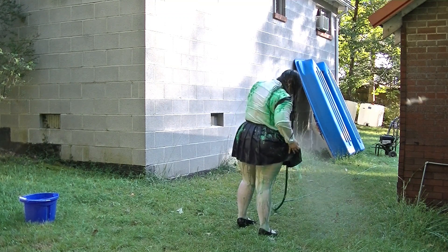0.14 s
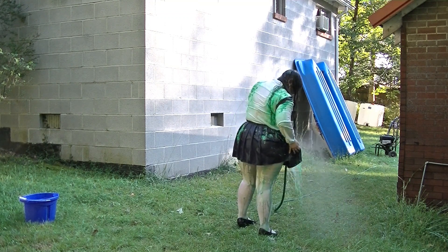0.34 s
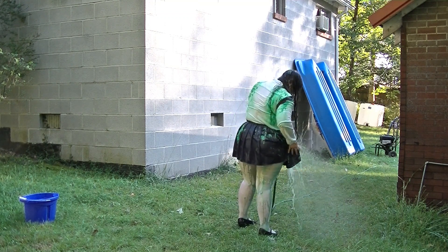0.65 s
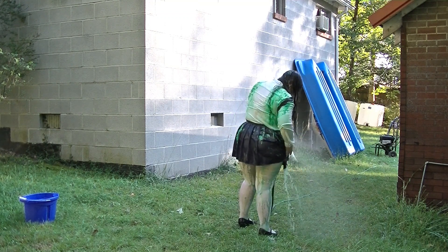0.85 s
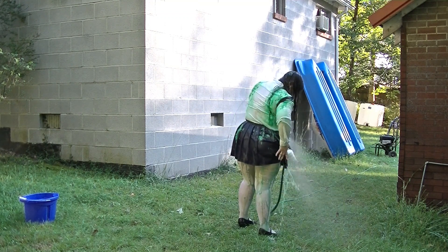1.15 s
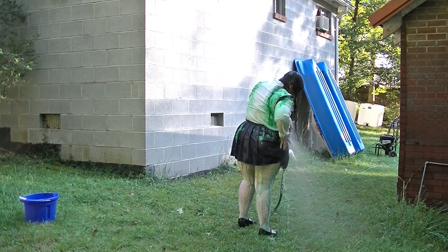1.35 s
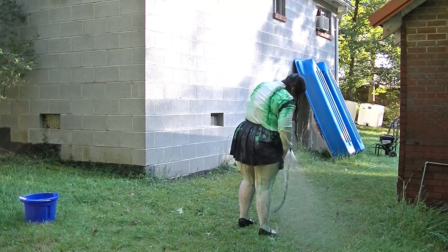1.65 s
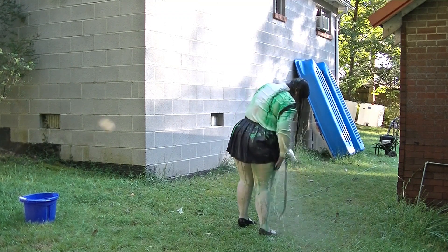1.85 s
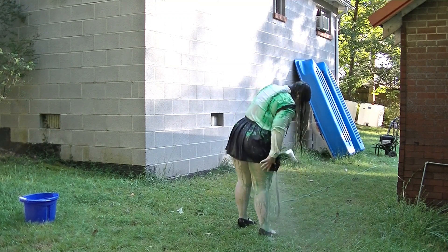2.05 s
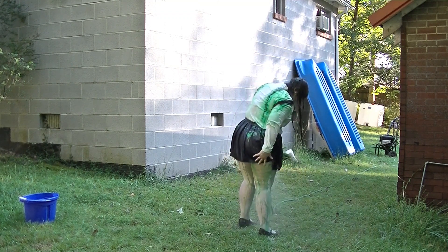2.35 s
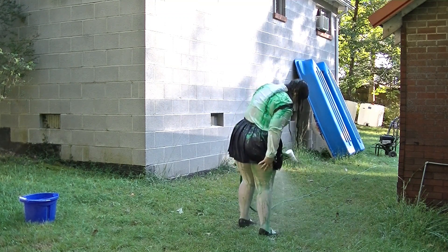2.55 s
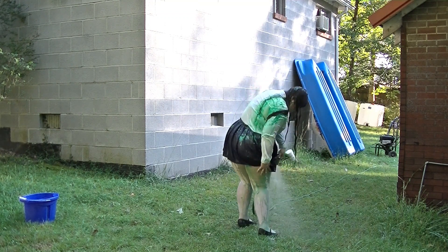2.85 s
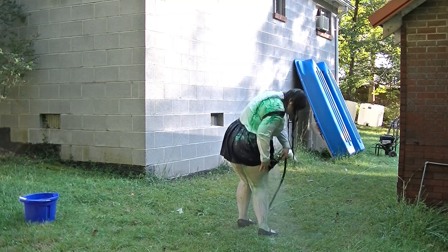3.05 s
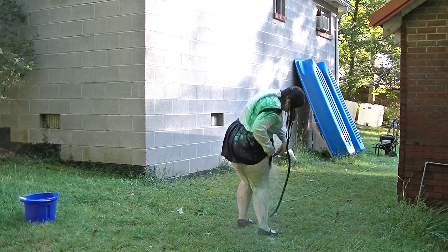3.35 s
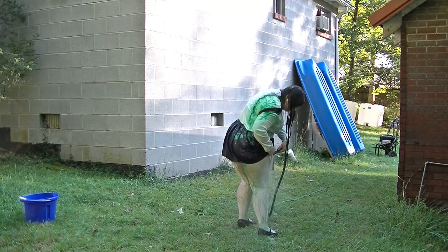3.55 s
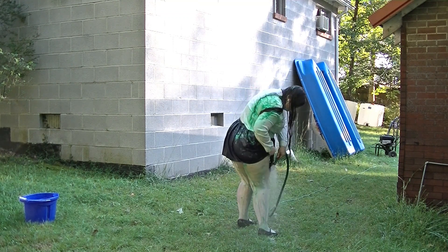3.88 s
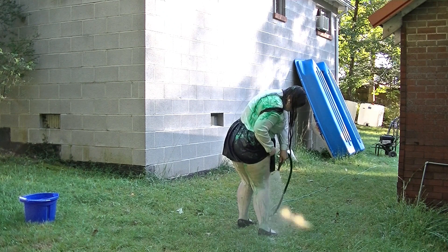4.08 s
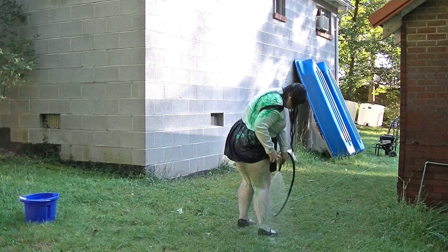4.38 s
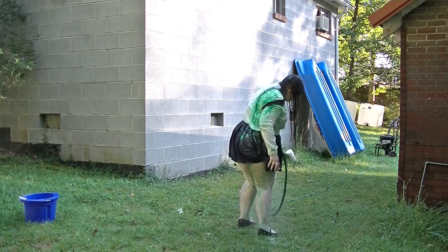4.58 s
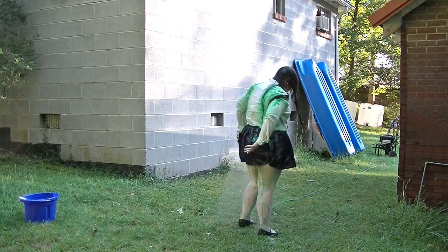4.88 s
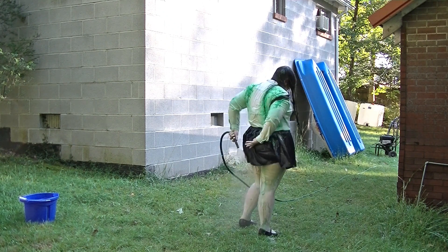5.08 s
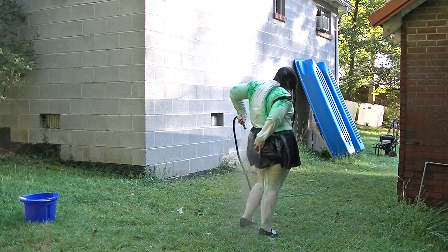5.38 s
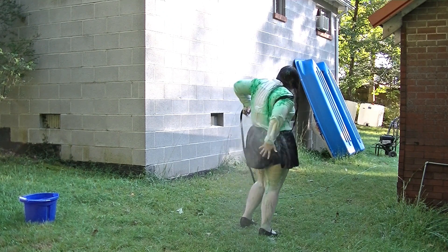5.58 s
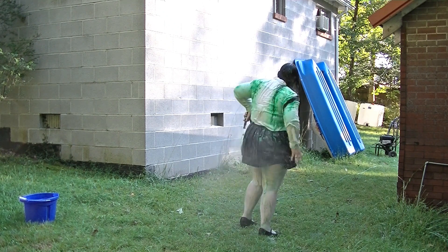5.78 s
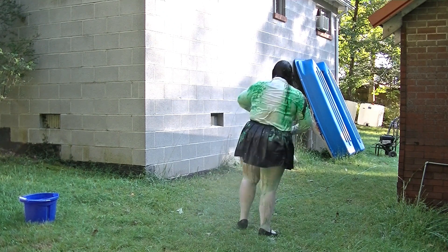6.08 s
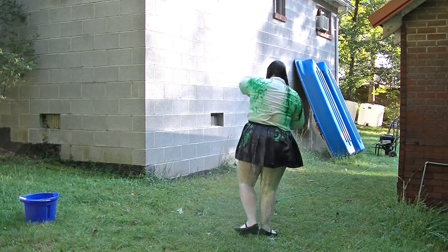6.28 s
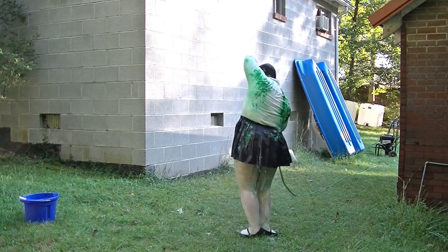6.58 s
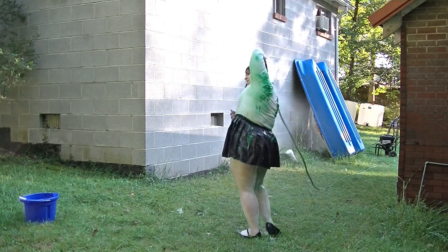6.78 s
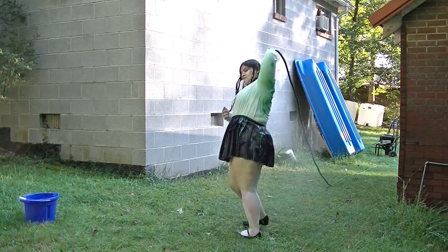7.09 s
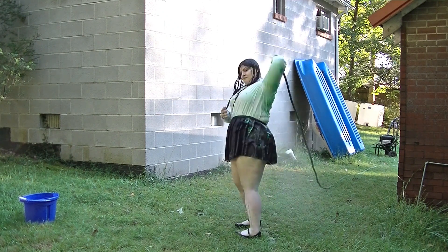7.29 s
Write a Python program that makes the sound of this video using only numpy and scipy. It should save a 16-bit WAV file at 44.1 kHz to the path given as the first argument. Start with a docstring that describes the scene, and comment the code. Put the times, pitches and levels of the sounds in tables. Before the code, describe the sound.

A garden hose plays over wet clothes and legs in a backyard, heard in stereo from a few metres. From 0 to 0.7 s the water drums low and hollow on cloth with splashing and small gurgles. It thins, then returns in short hissing sweeps near 1.1, 1.5 and 1.9 s. Around 2.1 s a couple of bright drops tick, and the flow drops to a light trickle with brief spurts at 2.4 and 2.8 s. From 3.1 to 3.9 s it surges to a loud, bright, splashing spray, then settles to thin misty run-off and near quiet by 4.9 s. Weaker splashes return from 5.2 to 6.3 s. At about 6.5 to 6.65 s heavy drops slap down rapidly, left of centre, beside a dull step. A quiet lull ends in a fresh splash at 7.4 s. Distant traffic and faint chirping insects continue throughout.

```python
"""Garden hose on wet clothes

A garden hose jet sweeps over wet clothes and legs in a backyard, a few metres from a camera.
It drums on cloth, splashes, spatters and hisses as mist: coloured noise with tiny ringing droplets.
Bursts with short rings are heavy drops, mostly to the left; wavering or sweeping tones are bubbles.
Broad noise is far traffic and run-off, narrow noise is insects; left and right differ most on top.
"""
import sys
import numpy as np
from scipy import signal
from scipy.fft import rfft, irfft, next_fast_len
from scipy.io import wavfile
from scipy.ndimage import uniform_filter1d, map_coordinates

SR = 44100
rng = np.random.default_rng(int(sys.argv[2]) if len(sys.argv) > 2 else 0)


def store_pcm(level_fs):
    """Save levels as 16-bit WAV."""
    pcm = np.round(np.clip(level_fs, -1, 1) * 32767).astype(np.int16)
    wavfile.write(sys.argv[1], SR, np.atleast_2d(pcm).T)


def invert_db(x):
    """Field ratio 10**(x/20) for x, a level in decibels (scalar or array-like)."""
    u = np.asarray(x, float) / 20
    return 10 ** u


N = 327663  # length of the scene [samples]


def jet():
    """Bigger drops sound lower and come more sparsely; the stream sputters in all parts together."""
    # colour of each part of the jet: (frequency [Hz], relative level per hertz [dB])
    drum_colour = [(200, -44), (480, -14.5), (620, -2), (850, 1.5), (1150, -3.5), (1600, -21)]
    splash_colour = [(400, -60), (950, -5), (1250, -1.5), (2200, 1.5), (2600, -15.5), (4000, -36)]
    spatter_colour = [(900, -52), (2400, -2.5), (2900, 0), (3700, -3), (4500, -3), (5100, -7), (5900, -1.5),
                      (6500, -6), (8500, -63)]
    mist_colour = [(2500, -28), (6400, -9), (7200, -4.5), (8500, -0.5), (9800, -0.5), (11500, -7.5),
                   (14000, -24.5), (15800, -28)]

    drum_db, splash_db, mist_db = strengths()
    spatter_db = mist_db + 0.53 * (splash_db - mist_db)  # about halfway from mist to splash
    sputter = 1.9 * wobble(42)

    drops = droplets(count=2000, hz=803, cycles=9.1, size_db=11.0, size=500)
    drum = water(drum_colour, drum_db + 0.078 * sputter, drops, share=0.11, patchy_db=1.5)

    drops = droplets(count=3000, hz=1793, cycles=15.8, size_db=3.0, size=320)
    splash = water(splash_colour, splash_db + 0.5 * sputter, drops, share=0.24, patchy_db=2.0)

    drops = droplets(count=6000, hz=3720, cycles=5.5, size_db=-6.0, size=120)
    spatter = water(spatter_colour, spatter_db + 0.35 * sputter, drops, share=0.091, patchy_db=2.5)

    drops = droplets(count=12000, hz=8470, cycles=4.3, size_db=8, size=50)
    mist = water(mist_colour, mist_db + 0.34 * sputter, drops, share=0.29, patchy_db=2.0)
    return hollow(drum + splash + spatter, width=.17) + mist


def strengths():
    """Levels of drumming, splash and mist: the sweeps add their power to the run-off."""
    # water running off the clothes: (time [s], drumming [dB], splash [dB], mist [dB])
    runoff = [(0, -36.5, -36.5, -44), (.6, -37.5, -41.5, -44), (.9, -45.5, -45, -69), (1.4, -41, -58, -50),
              (1.7, -51, -48, -48), (2.05, -53.5, -53, -44.5), (2.3, -94, -65, -48.5),
              (2.6, -56.5, -63, -50.5), (3.05, -56, -56, -48), (4.1, -52, -51.5, -43.5),
              (4.55, -93, -53, -42.5), (4.9, -65, -60, -53.5), (5.2, -46, -49.5, -46),
              (5.6, -48.5, -42, -50.5), (6.5, -49, -47, -52), (6.7, -57, -51.5, -57),
              (7.05, -65, -55, -54.5), (7.43, -41, -47.5, -53.5)]
    # jet passing over the cloth: (middle [s], length [s], drumming [dB], splash [dB], mist [dB])
    sweeps = [(0.144, 0.1, -37.5, -38.5, -37), (0.393, 0.11, -36, -43, -64), (0.595, 0.26, -42, -44, -67),
              (0.76, 0.13, -49, -65, -40.5), (1.074, 0.21, -66, -43, -34), (1.27, 0.18, -55, -41.5, -43.5),
              (1.499, 0.14, -41.5, -38.5, -39), (1.879, 0.13, -43, -42, -38.5),
              (2.445, 0.074, -44, -53.5, -48), (2.834, 0.15, -45, -40, -38.5),
              (3.175, 0.15, -36.5, -34, -36), (3.402, 0.14, -36, -30, -29), (3.485, 0.091, -52, -39, -28),
              (3.624, 0.22, -35.5, -27.5, -24), (3.857, .2, -47.5, -34, -30), (4.757, 0.046, -51, -68, -55),
              (5.19, 0.076, -59, -43.5, -64), (5.377, 0.16, -46, -38, -37.5), (5.514, 0.052, -51, -51, -41),
              (5.78, 0.1, -47, -59, -49), (5.908, 0.029, -63, -54, -70), (6.225, 0.2, -54, -56, -47.5),
              (6.43, 0.06, -60, -43.5, -44), (6.601, 0.078, -61, -41, -47.5), (7.215, 0.018, -59, -48, -44),
              (7.424, 0.09, -56, -33.5, -37.5)]

    t = np.arange(0, N + 64, 64) / SR  # a coarse clock is enough for levels
    knot_s, *runoff_db = np.transpose(runoff)
    middle, length, *sweep_db = np.transpose(sweeps)
    runoff_power = invert_db(2 * np.array([np.interp(t, knot_s, db) for db in runoff_db]))
    sweep_power = invert_db(2 * np.array(sweep_db)) @ bell(t, middle, length)
    level_db = 10 * np.log10(runoff_power + sweep_power)
    return [np.interp(np.arange(N) / SR, t, db) for db in level_db]


def water(colour, level_db, drops, share, patchy_db):
    """One part of the jet: rushing noise with droplets on it, plus a part not shared by the ports."""
    # unshared part of the two microphone ports: (frequency [Hz], level against shared part [dB])
    ports = [(4000, -24), (8000, -18), (10000, -4.5), (12000, 0), (15800, 2.5)]

    tint = lambda hz: invert_db(along(colour, hz))
    rush, side = unit(filtered(rng.standard_normal((2, N)), tint))
    drops = unit(filtered(drops, tint))
    mid = np.sqrt(1 - share) * rush + np.sqrt(share) * drops  # share of the power is droplets
    mid, side = patchy(np.array([mid, side]), patchy_db)
    side = filtered(side, lambda hz: invert_db(along(ports, hz)))
    return invert_db(level_db) * np.array([mid + side, mid - side]) / np.std(mid)


def droplets(count, hz, cycles, size_db, size):
    """Damped sines of varied size at random times and pitches, rising in pitch as they ring.

    hz is the middle pitch; cycles sets how long a drop rings; size is its length [samples].
    """
    draw = rng.random((count, 3))  # time, pitch and size of each drop
    pitch = hz * np.exp(0.878 * (draw[:, 1:2] - .5))
    turns = pitch * np.arange(size) / SR
    big = invert_db(size_db * draw[:, 2:] ** 4)  # most drops stay near 0 dB, a few come close to size_db
    shape = (1 - np.exp(-turns)) * np.exp(-3 * turns / cycles)
    wave = big * shape * np.sin(2 * np.pi * turns * (1 + 0.19 * turns / cycles))
    at = (draw[:, :1] * N).astype(int) + np.arange(size)
    return unit(np.bincount(at.ravel(), wave.ravel(), N + size)[:N])


def hollow(x, width):
    """Each air pocket in the wet cloth lifts two resonances, set by width [octaves], while it lasts."""
    # air pockets: (middle [s], length [s], first resonance [Hz], lift [dB])
    pockets = [(.3, .4, 1250, 5), (.25, .45, 1580, 6), (.6, .16, 1650, 11), (2.44, .12, 1100, 5),
               (2.45, .13, 2150, 8), (2.82, .2, 1130, 8), (3.11, .06, 1050, 7), (3.39, .11, 1800, 10),
               (3.57, .26, 4450, 8), (3.78, .36, 2950, 6), (3.66, .32, 1800, 7), (3.86, .07, 5300, 8),
               (5.62, .28, 3400, 6), (5.6, .3, 630, 10), (5.76, .16, 1330, 7), (5.82, .08, 850, 8),
               (6.02, .16, 1750, 6), (6.32, .2, 1280, 10), (6.6, .06, 3050, 6)]
    overtone, overtone_share = 1.62, .35  # second resonance over the first: frequency, lift in dB

    hz, t, z = signal.stft(x, SR, nperseg=512)
    middle, length, pocket_hz, lift_db = np.transpose(pockets)
    peak = lambda centre_hz: np.exp(-(np.log2((hz[:, None] + 1) / centre_hz) / width) ** 2)
    peaks = peak(pocket_hz) + overtone_share * peak(overtone * pocket_hz)
    gain_db = (peaks * lift_db) @ bell(t, middle, length)
    out = signal.istft(z * invert_db(gain_db), nperseg=512)[1][..., :N]
    power = lambda v: np.abs(uniform_filter1d(np.mean(v ** 2, 0), SR // 20)) + 1e-14
    return out * np.sqrt(power(x) / power(out))  # the colour moves, the level stays


def slaps():
    """Each heavy drop: a short broad burst and a wet ring that fades over a set number of cycles."""
    # heavy drops slapping down: (time [s], level [dB], ring [Hz], left minus right [dB])
    drops = [(2.099, -26, 5950, -3), (2.1548, -24.5, 6100, 3), (4.775, -33.5, 1610, 5),
             (6.4945, -20.5, 1950, 5.5), (6.5415, -29, 3600, 11), (6.5575, -25, 3100, 3),
             (6.566, -19.5, 2080, 5), (6.587, -23.5, 3020, 5), (6.6, -26, 2930, 6),
             (6.6188, -21.5, 1960, 4.5), (6.6203, -21.5, 2800, 4.5), (6.6364, -30, 3460, 5),
             (7.201, -34, 1890, 2)]
    # colour of the burst: (frequency [Hz], relative level per hertz [dB])
    burst_colour = [(600, -56), (1800, 4.5), (6000, 0.5), (10500, -3.5), (13000, -16)]

    out, t = np.zeros((2, N + SR)), np.arange(SR // 20) / SR
    hiss = unit(filtered(rng.standard_normal(N + SR), lambda hz: invert_db(along(burst_colour, hz))))
    for s, db, hz, pan_db in drops:
        start = round(s * SR)
        burst = hiss[start - len(t):][:len(t)] * invert_db(-4 - 60 * t / 0.014)  # falls 60 dB in 14 ms
        waver = np.cumsum(rng.normal(0, .13, len(t)))  # random phase drift [rad]
        ring_fade = invert_db(-3.5 - 60 * t * hz / 60)  # falls 60 dB in 60 cycles
        ring = np.sin(2 * np.pi * hz * t + waver) * ring_fade
        sound = invert_db(db) * (burst + ring) * (1 - np.exp(-t / 0.00045))
        out[:, start:][:, :len(t)] += invert_db([[pan_db / 2], [-pan_db / 2]]) * sound
    return out[:, :N]


def gurgles():
    """Each large bubble in the soaked cloth rings on one wavering pitch, swelling and fading."""
    # gurgling bubbles: (middle [s], length [s], level [dB], pitch [Hz])
    bubbles = [(.052, 0.029, -30.5, 1495), (0.148, .03, -35, 1536), (.395, 0.046, -33, 1533),
               (0.635, .035, -35, 1737), (0.807, 0.048, -31.5, 1554), (1.21, 0.021, -33, 920),
               (1.3, .018, -29, 916), (1.477, 0.028, -30.5, 2290), (1.485, 0.018, -31, 1770),
               (3.09, 0.016, -27, 1060), (3.14, 0.021, -25.5, 1465), (3.226, 0.044, -29, 1284),
               (3.538, .035, -22, 5530), (5.172, .025, -38, 1700), (5.401, 0.042, -34, 2040),
               (5.792, 0.023, -37, 1290), (5.916, 0.015, -32.5, 2010), (6.163, 0.018, -37, 960),
               (6.275, 0.031, -39, 1860)]

    middle, length, db, hz = np.transpose(bubbles)
    t = np.arange(-SR // 20, SR // 20) / SR
    waver = np.cumsum(.09 * rng.standard_normal((len(hz), len(t))), 1)  # random phase drift [rad]
    tone = np.sin(2 * np.pi * hz[:, None] * t + waver)
    wave = invert_db(db)[:, None] * bell(t, 0 * middle, length) * tone
    at = np.round((middle[:, None] + t) * SR).astype(int)
    return np.bincount(at.ravel(), wave.ravel(), N)[:N]


def plops():
    """A trapped bubble sweeps upward as it closes; a step gives a dull low knock."""
    # closing bubbles: (time [s], peak level [dB], start pitch [Hz], end pitch [Hz], life [s])
    bubbles = [(2.1368, -31.5, 1350, 3900, 0.0076), (2.9908, -34.5, 1900, 6600, 0.0042)]
    # a shoe on wet grass: (time [s], level [dB], pitch [Hz], time to fall 60 dB [s])
    steps = [(6.4455, -25, 355, 0.032)]

    out, t = np.zeros(N + SR), np.arange(SR // 10) / SR
    for s, db, start_hz, end_hz, life in bubbles:
        u = np.clip(t / life, 0, 1)  # age: 0 at the start, 1 at the end
        sweep = np.sin(2 * np.pi * np.cumsum(start_hz + (end_hz - start_hz) * u) / SR)
        swell = np.sqrt(np.sin(np.pi * u).clip(0)) * (u < 1)
        out[round(s * SR):][:len(t)] += invert_db(db) * swell * sweep
    for s, db, hz, t60 in steps:
        fade = invert_db(db - 60 * t / t60) * (1 - np.exp(-t / 0.0054))
        out[round(s * SR):][:len(t)] += fade * np.sin(2 * np.pi * hz * t)
    return out[:N]


def yard():
    """Far traffic and trickling run-off: slowly swaying noise, least alike left and right on top."""
    # colour of the yard: (frequency [Hz], relative level per hertz [dB])
    colour = [(18, -45), (30, -39), (145, -6), (580, -1), (2100, -7.5), (3930, -11.5), (4610, -5.5),
              (6480, -13), (7780, -2.5), (10100, -20), (13500, -27), (15800, -16)]
    # how alike left and right are: (frequency [Hz], likeness [1 = the same])
    alike = [(30, 1), (125, 0.62), (400, 0.87), (1200, 0.94), (8000, 0.83), (12000, 0.14)]

    # the angle splits the power between the sum and the difference of the channels
    turn = lambda hz: np.arccos(np.clip(along(alike, hz), -1, 1)) / 2
    tint = lambda hz: invert_db(along(colour, hz)) * [np.cos(turn(hz)), np.sin(turn(hz))]
    pair = patchy(rng.standard_normal((2, N)), patchy_db=1.85)
    mid, side = filtered(pair, tint)
    level_db = -47 + 0.83 * wobble(1.12)
    return invert_db(level_db) * np.array([mid + side, mid - side]) / np.std(mid)


def insects():
    """Narrow bands of noise: a steady chorus all round, and one singer chirping in time."""
    # insects: (pitch [Hz], half-width [Hz], level [dB], chirps a second [Hz], 0 = steady)
    singers = [(4600, 330, -59, 0), (7050, 180, -60, 15.4)]

    out, t = 0, np.arange(N) / SR
    for hz, width_hz, db, rate in singers:
        band = lambda f: np.exp(-((f - hz) / width_hz) ** 2)
        near, round_about = filtered(rng.standard_normal((2, N)), band)
        beat = np.cos(np.pi * rate * (t - .002)) ** 8
        pair = np.array([near + .3 * round_about, near - .4 * round_about])
        out = out + invert_db(db + .6 * wobble(2)) * unit(beat * pair)
    return out


def bell(t, middle, length):
    """One row per event: 1 in the middle, a half at either end of its length."""
    squareness = 2.63  # 2 = bell-shaped, more = flatter top
    return .5 ** (np.abs(2 * (t - middle[:, None]) / length[:, None]) ** squareness)


def unit(x):
    """Scale to an rms (average strength) of 1."""
    return x / np.sqrt(np.mean(x ** 2) + 1e-20)


def along(points, hz):
    """Read a curve of (frequency [Hz], value) points on a log frequency axis."""
    f, v = np.transpose(points)
    return np.interp(np.log(hz + 1), np.log(f + 1), v)


def wobble(rate):
    """A smooth random curve through rate random points a second."""
    points = rng.standard_normal(int(N * rate / SR) + 4)
    return map_coordinates(points, [np.arange(N) * rate / SR])


def filtered(x, response):
    """Weigh each frequency of x by response(frequency)."""
    m = next_fast_len(N + 8192)
    return irfft(rfft(x, m) * response(np.fft.rfftfreq(m, 1 / SR)), m)[..., :N]


def patchy(x, patchy_db):
    """Random patches of gain over time and frequency, the same in both channels."""
    z = signal.stft(x, nperseg=512)[2]
    field = rng.standard_normal(z.shape[-2:])
    field = uniform_filter1d(uniform_filter1d(field, 5, 0), 9, 1)
    return signal.istft(z * invert_db(patchy_db * unit(field)), nperseg=512)[1][..., :N]


def scene():
    """Water near, yard far; slaps and gurgles are thinned out in the bass."""
    no_bass = lambda hz: (hz ** 2 / (hz ** 2 + 600 ** 2)) ** 2
    drops = filtered(slaps() + gurgles(), no_bass)
    return jet() + drops + plops() + yard() + insects()


def low_pass(x):
    """Removes everything above the highest recorded frequency."""
    return signal.sosfilt(signal.butter(12, 15790, fs=SR, output="sos"), x)


def record(dry):
    """Gain control turns loud passages down, the background with them."""
    power = np.abs(uniform_filter1d(np.mean(dry ** 2, 0), round(.3 * SR)))  # averaged over 0.3 s
    level_db = 10 * np.log10(power + 1e-12)
    over_db = np.maximum(level_db + 35.0, 0)  # how far the level is above -35 dB
    levelled = dry * invert_db(-.4 * over_db)
    return low_pass(levelled)


dry = scene()
out = record(dry)
store_pcm(out)
```